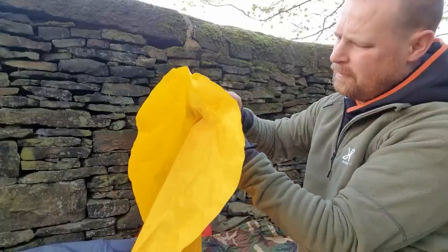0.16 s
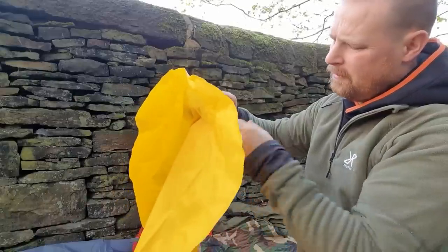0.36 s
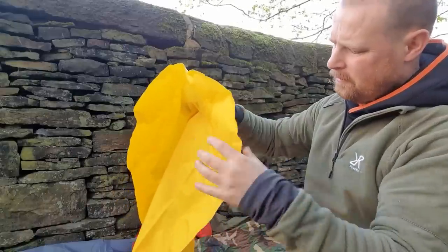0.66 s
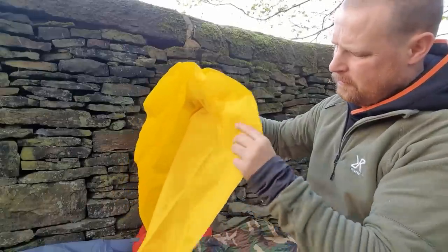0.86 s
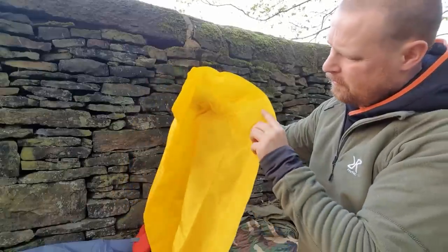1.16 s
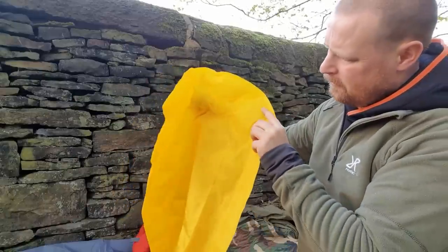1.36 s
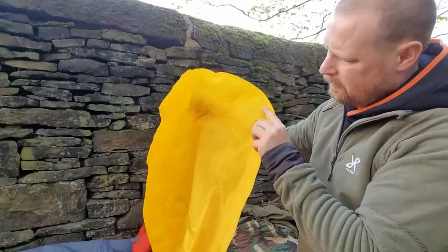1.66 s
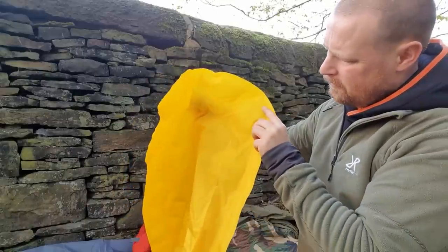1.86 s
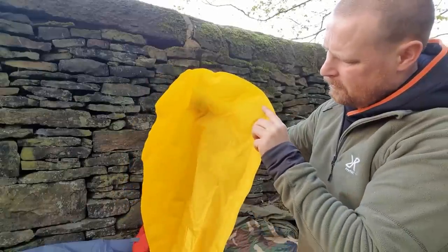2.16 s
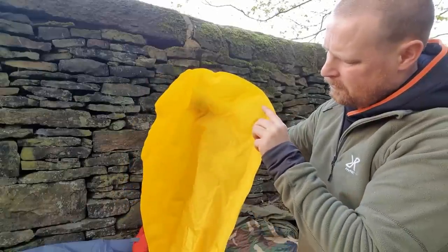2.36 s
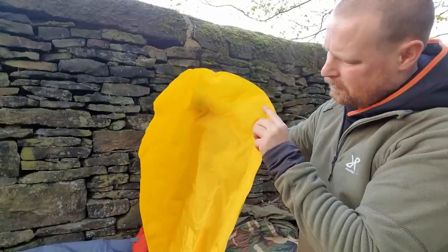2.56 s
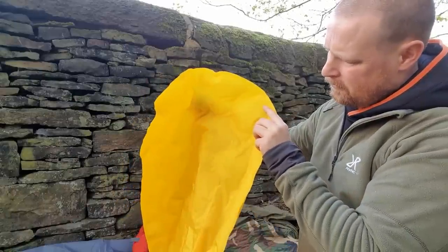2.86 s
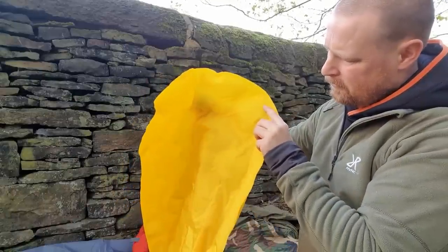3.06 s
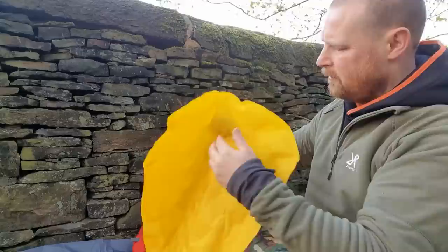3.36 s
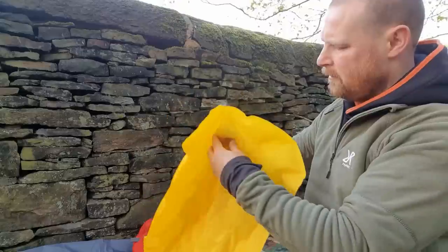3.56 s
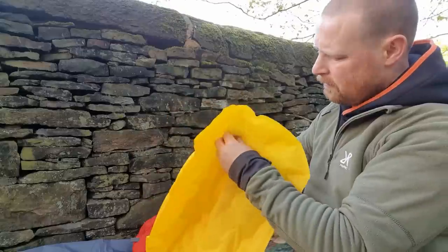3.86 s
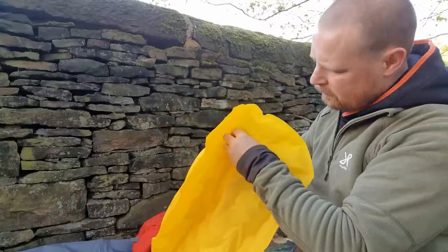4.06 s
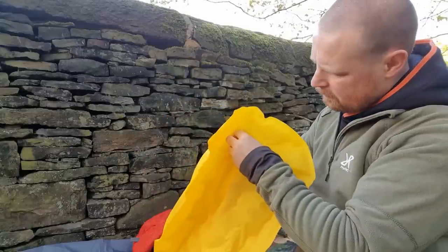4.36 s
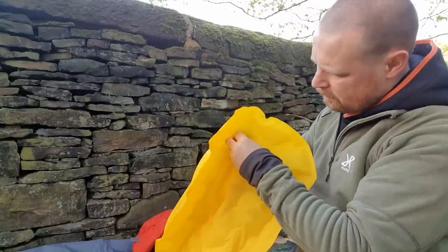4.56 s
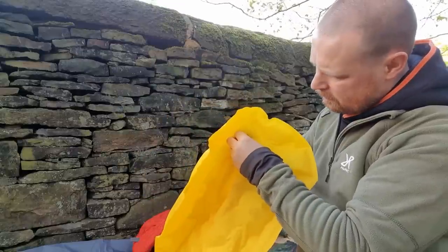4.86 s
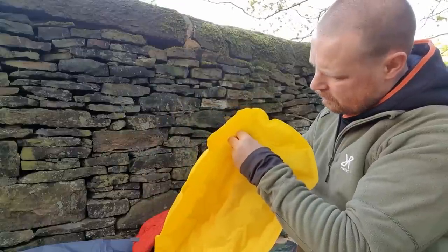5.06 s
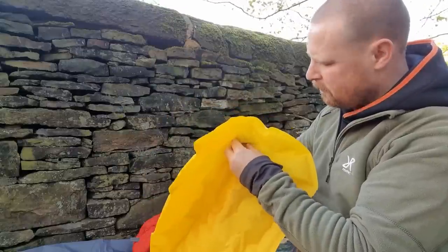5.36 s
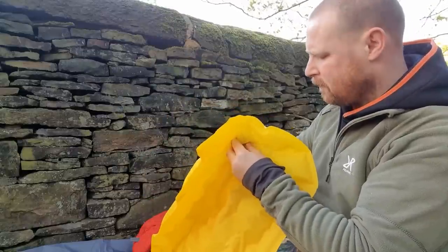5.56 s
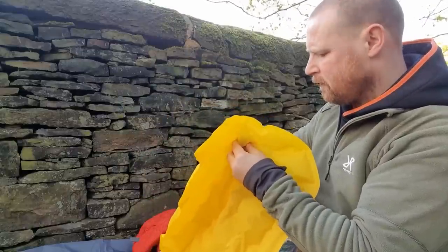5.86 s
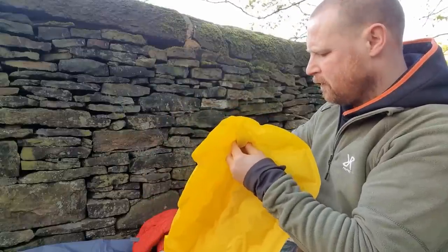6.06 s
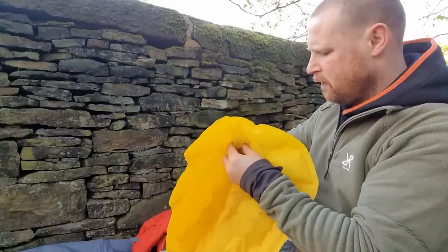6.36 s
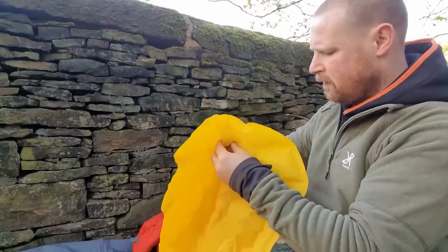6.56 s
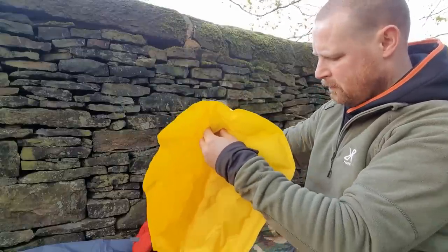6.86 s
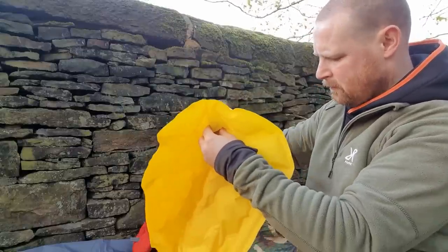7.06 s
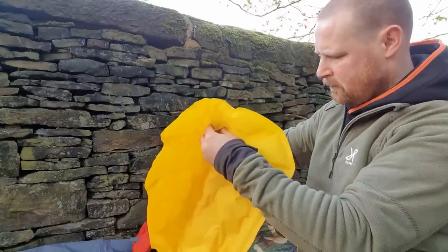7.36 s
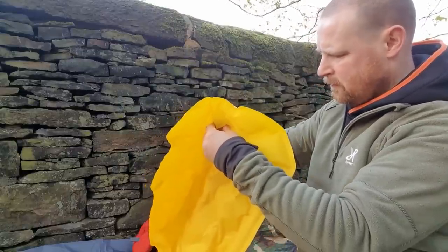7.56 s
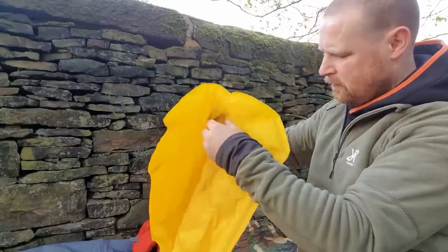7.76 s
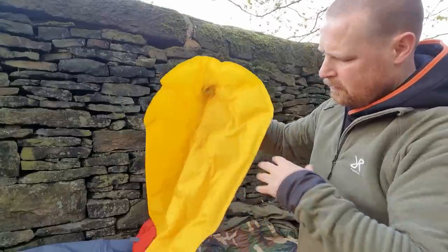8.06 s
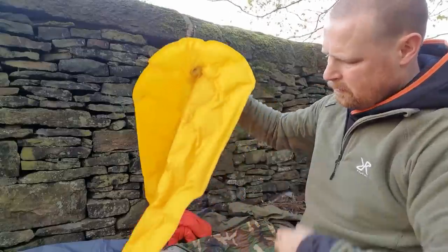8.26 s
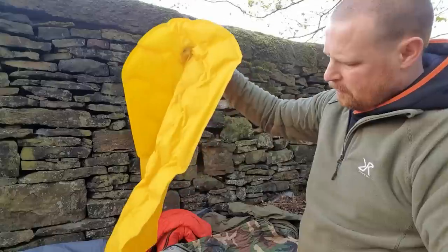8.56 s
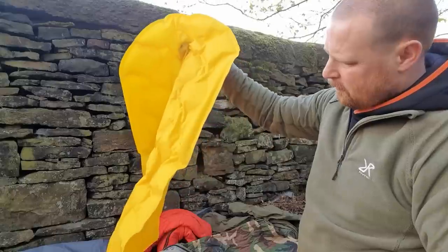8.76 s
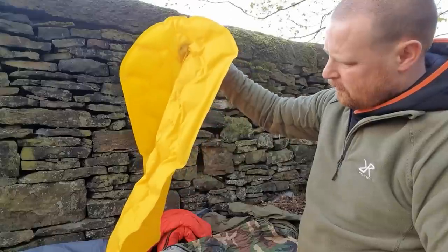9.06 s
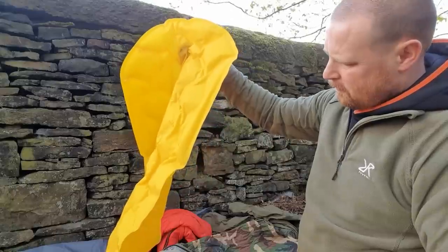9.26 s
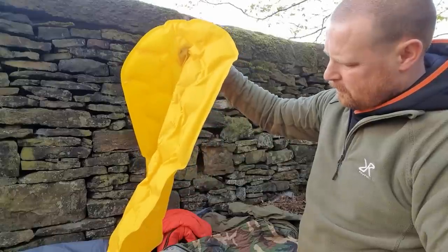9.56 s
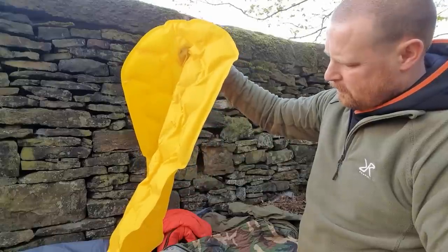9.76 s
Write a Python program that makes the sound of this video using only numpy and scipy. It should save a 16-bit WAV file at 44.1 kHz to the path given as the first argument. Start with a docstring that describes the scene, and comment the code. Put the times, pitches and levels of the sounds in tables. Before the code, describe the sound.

Outdoors, a small battery pump runs without a break close to the microphones, a piercing, slightly wavering blade whine over a strong airy rush. Tone and hiss shift as hand and fabric move around it. Just past halfway the intake is choked for an instant, the pitch races up, and air bursts back. Soft wind rumbles and buffets low underneath.

```python
"""Outdoors, a small hand-held battery pump with a nine-bladed impeller inflates a mat near two microphones.
Sines locked to the rotor speed make the hum and the blade whine; filtered noise makes the air rush,
with resonances of inlet and housing that the moving hand and fabric shade.
Once the hand chokes the inlet: the rush changes, the rotor races, then air bursts back in.
Light wind rumbles and buffets the microphones as low noise, and a far drone, a hump of noise, grows."""
import sys
import numpy as np
from scipy import signal
from scipy.io import wavfile
from scipy.ndimage import uniform_filter1d

SR = 44100
rng = np.random.default_rng(int(sys.argv[2]) if len(sys.argv) > 2 else 0)


def transcribe(signal):
    """Save signal, clipped to [-1, 1], as a 16-bit WAV file at the path in sys.argv[1]."""
    frames = np.atleast_2d(signal).T
    limited = np.clip(frames, -1, 1)
    pcm = np.round(limited * 32767).astype(np.int16)
    wavfile.write(sys.argv[1], SR, pcm)


N = 437472  # samples
SIZE, HOP = 512, 128  # short-time frame of the air rush and its step, samples

# extra travel of the pump sound to the left microphone: t/s, delay/us
LEFT_DELAY = [(0, 125), (5.3, 36), (7.0, 70), (9.92, 113)]
# the choke: when the inlet reopens, and how long it closes, stays shut and opens
OPEN_S, CLOSING_S, SHUT_S, OPENING_S = 5.21, .03, .04, .03


def amp(db):
    """Amplitude factor of a level in dB."""
    return 10 ** (np.asarray(db) / 20)


def evened(x):
    """Scale to unit mean power."""
    return x / np.sqrt(np.mean(x ** 2) + 1e-20)


def curve(rows, t):
    """All columns of a breakpoint table at times t, joined by straight lines."""
    s, *columns = np.transpose(rows)
    return np.array([np.interp(t, s, c) for c in columns])


def shape(points, hz):
    """Spectrum gain of unit mean power, through (Hz, dB) points on a log frequency axis."""
    f, db = np.transpose(points)
    return evened(amp(np.interp(np.log(hz + 1), np.log(f), db)))


def wander(t, top_hz, channels=1, count=30):
    """Slow random curves of unit power: sines of random phase up to top_hz, the slower the stronger."""
    f = np.geomspace(top_hz / 20, top_hz, count)[:, None]
    coarse = np.arange(0, t[-1] + .01, .002)
    rows = []
    for _ in range(channels):
        phase = 2 * np.pi * (f * coarse + rng.random((count, 1)))
        row = evened((np.sin(phase) / np.sqrt(f)).sum(0))
        rows.append(np.interp(t, coarse, row))
    return np.array(rows)


def noise_pair(left, right, same, size, turn=1):
    """Two partly alike noises with the given short-time magnitudes; turn rotates the left phase."""
    a, b, c, d = rng.standard_normal((left.shape[1], left.shape[0], 4)).T
    same = np.clip(same, 0, 1)
    shared = a + 1j * b
    own = c + 1j * d
    left_bins = left * shared * turn
    right_bins = right * (same * shared + np.sqrt(1 - same ** 2) * own)
    pair = signal.istft(np.array([left_bins, right_bins]), nperseg=size, noverlap=size * 3 // 4)[1]
    return pair[:, :N] * np.sqrt(1.98 / size)


def rotor():
    """Tones at multiples of the slightly unsteady rotor speed: unbalance hum, blade whine and its octave."""
    # t/s, speed/(turns per s)
    rotor_speed = [(0.0, 646.5), (0.1, 649.1), (0.38, 646.1), (1.0, 649.4), (2.08, 640.7), (2.6, 642.8),
                   (2.9, 639.2), (3.65, 638.0), (3.8, 642.3), (4.18, 645.7), (4.55, 642.7), (5.73, 638.4),
                   (6.26, 640.9), (6.45, 644.4), (6.62, 638.0), (6.86, 634.9), (7.22, 640.4), (7.75, 641.9),
                   (8.0, 637.1), (9.92, 639.2)]
    # rotor unbalance, once a turn: t/s, level/dB
    hum = [(0, -40.5), (1.29, -37.5), (3.38, -51), (3.62, -56), (3.66, -40), (5.3, -40.5), (5.7, -44),
           (5.77, -59.5), (6.8, -48.5), (7.1, -41.5), (7.9, -36.5), (8.35, -44.5), (9.92, -44)]
    # blade-passing tone: t/s, left level/dB, right level/dB, lead of left/rad
    whine = [(0, -22, -25, 1.8), (.33, -26, -31, 1.0), (.42, -27.5, -28.5, -3.0), (.81, -26.5, -30, -3.1),
             (.91, -36, -34.5, -3.3), (1.89, -29.5, -39, -.8), (2.72, -37, -47.5, .9),
             (2.83, -29, -36.5, 1.3), (3.25, -31, -40, 2.3), (3.38, -31, -28.5, 4.0),
             (3.61, -31.5, -39, 5.2), (3.69, -22, -33, 7.6), (3.87, -31, -28.5, 8.2),
             (4.05, -30.5, -33, 11.3), (4.7, -32.5, -32, 8.8), (4.82, -45, -38, 9.8),
             (5.195, -41, -42, 11.8), (5.25, -23.5, -22.5, 11.2), (5.51, -35.5, -37, 14.6),
             (5.71, -36.5, -37.5, 11.5), (6.32, -30, -32.5, 13.9), (6.52, -35, -35, 12.4),
             (6.66, -25, -29, 11.9), (7.07, -25, -30.5, 9.2), (7.44, -27.5, -29.5, 8.8),
             (7.54, -26, -34, 10.3), (7.74, -29, -30.5, 10.6), (7.84, -17.5, -19.5, 9.6),
             (8.07, -20.5, -19.5, 10.2), (8.35, -23.5, -32, 9.5), (8.44, -21.5, -26, 14.2),
             (9.92, -25.5, -24, 14.1)]
    # echoes off hand or fabric briefly cancel the whine: t/s, left drop/dB, right drop/dB
    dips = [(.37, 10, 20), (1.27, 14, 14), (4.12, 13, 4), (5.35, 12, 0), (6.81, 3, 15), (8.167, 0, 19),
            (8.4, 11, 18)]
    # octave of the whine: t/s, left level/dB, right level/dB
    octave = [(0, -27, -34), (.3, -41, -41), (2.7, -44, -46), (2.9, -34, -36), (3.4, -47, -47),
              (4.56, -26, -32), (5.21, -44, -48), (5.35, -29, -28), (5.6, -38, -42), (6.25, -48, -48),
              (6.77, -30, -38), (7.27, -48, -42), (7.42, -38, -32), (7.85, -30, -39), (8.15, -27, -35),
              (8.43, -37, -40), (9.92, -34, -38)]
    # faint tone: multiple of speed, left level/dB, right level/dB
    faint = [(3, -43, -40)]
    blades, dip_s = 9, .018

    t = np.arange(N) / SR
    speed = curve(rotor_speed, t)[0] + race(t) + 0.45 * wander(t, 40.)[0]
    angle = 2 * np.pi * np.cumsum(speed) / SR
    late = np.array([2 * np.pi * speed * curve(LEFT_DELAY, t)[0] * 1e-6, 0 * t])

    # the hum lags on the left by 1.9 times the plain travel delay
    out = amp(curve(hum, t) + 1.5 * wander(t, 90.)) * np.sin(angle - 1.9 * late)

    left_db, right_db, lead = curve(whine, t)
    dips_db = sum(np.c_[drop_db] * np.exp(-((t - s) / dip_s) ** 2) for s, *drop_db in dips)
    flutter_db = 1.4 * wander(t, 45., channels=2)
    whine_gain = amp([left_db, right_db] - dips_db + flutter_db)
    lead_pair = [lead + .35 * wander(t, 40.)[0], 0 * t]
    out += whine_gain * np.sin(blades * angle + lead_pair)

    # short waves scatter off hand and fabric: level and phase drift apart at the two microphones
    drift = [[-1.8], [0]] + .8 * wander(t, 12., channels=2)
    octave_gain = amp(curve(octave, t) + 3.0 * wander(t, 40., channels=2))
    out += octave_gain * np.sin(2 * blades * angle + drift)

    for multiple, *db in faint:
        flutter_db = 2.5 * wander(t, 10.0, channels=2)
        out += amp(np.c_[db] + flutter_db) * np.sin(np.round(multiple) * (angle - late))
    return np.sqrt(2) * out  # makes the table levels RMS levels


def rush():
    """Turbulent air excites the housing resonances; eddies make the level patchy and flickering."""
    # resonances of inlet and housing: f/Hz, width 9 dB down/Hz, left over right/dB, left-right likeness (0-1)
    housing = [(1774, 1060, -2, 0.94), (2535, 1130, -5, 0.9), (3310, 1300, -2, 0.043),
               (5240, 2100, 2.5, 0.85), (6940, 1610, -6, 0.15), (10305, 1060, -3, 0.043)]
    # relative spectrum of the broad jet noise: f/Hz, level/dB
    hiss = [(350, -66), (700, -41), (1000, -2), (6000, -5.5), (8500, -19.5), (12300, -7), (15500, -11)]
    # ridges and notches while the hand holds still: f/Hz, start/s, end/s, left gain/dB, right gain/dB
    ridges = [(2190, 0, 7.9, -4, -6), (2670, 1.0, 3.8, 4, 4), (2640, 5.36, 5.4, 5, 5),
              (3400, 8.0, 9.92, -6, 0)]
    hiss_db, ridge_hz = -36, 120  # jet level ahead of the side gains; ridge half-width

    hz = np.fft.rfftfreq(SIZE, 1 / SR)
    t = np.arange(N // HOP + 5) * HOP / SR
    f, width, pan_db, same = np.array(housing).T[:, :, None, None]
    modes = (1 + (2 * (hz[:, None] - f) / width) ** 2) ** -3.0 * np.ones(len(t))
    power = amp(housing_db(t)) ** 2
    modes *= (power / modes.mean(1))[:, None]

    # the jet follows the total resonance power, but less strongly
    total = power.sum(0)
    jet_power = amp(hiss_db) ** 2 * (total / total.mean()) ** .45
    jet = np.outer(shape(hiss, hz) ** 2, jet_power)

    # these are powers, so each side moves by half the dB written here
    left = (modes * amp(pan_db)).sum(0) + jet * amp(2.5)
    right = (modes / amp(pan_db)).sum(0) + jet / amp(-7.5)
    jet_alike = jet * 0.75 / (1 + (hz[:, None] / 4000) ** 2)
    alike = ((modes * same).sum(0) + jet_alike) / (modes.sum(0) + jet)

    # echoes off hand and fabric lay narrow, slowly shifting ridges over the spectrum
    patches = rng.standard_normal((len(t), len(hz))).T
    patches = uniform_filter1d(patches, size=2, axis=0)
    patches = evened(uniform_filter1d(patches, size=300, axis=1))
    ridges_db = np.zeros((2, len(hz), len(t)))
    for center_hz, start, end, *db in ridges:
        held = np.clip(np.minimum(t - start, end - t) / .15 + 1, 0, 1)  # fades 0.15 s beyond each end
        ridge = np.outer(np.exp(-((hz - center_hz) / ridge_hz) ** 2), held)
        ridges_db += np.c_[db][:, None] * ridge
    eddies = amp(ridges_db + 1.5 * patches + .7 * wander(t, 80.))

    delay = np.exp(-2j * np.pi * np.outer(hz, curve(LEFT_DELAY, t)[0]) * 1e-6)
    return noise_pair(np.sqrt(left) * eddies[0], np.sqrt(right) * eddies[1], alike, size=SIZE, turn=delay)


def housing_db(t):
    """Level of each resonance: hand and fabric shade the air rush, and the choke reshapes it."""
    # t/s, low rush level/dB, main resonance level/dB, treble level/dB
    air = [(0, -32.5, -20.5, -36.5), (1.16, -29, -23.5, -45), (3.15, -30, -24.5, -48),
           (3.46, -31, -26.5, -48.5), (3.8, -30, -21, -42), (4.1, -30.5, -27.5, -41),
           (4.65, -36, -22.5, -34), (5.0, -24.5, -26, -40.5), (5.2, -32, -30.5, -44),
           (5.37, -34.5, -21.5, -36), (5.6, -29.5, -29, -40), (6.2, -25.5, -28.5, -38.5),
           (6.53, -25, -31.5, -44), (6.72, -30.5, -27.5, -46), (7.3, -29.5, -28.5, -40.5),
           (7.7, -25, -24.5, -47), (7.97, -31, -30, -43.5), (8.4, -32, -30.5, -52),
           (8.72, -31.5, -32, -40.5), (9.92, -35, -32, -41)]
    # third to fifth resonance follow those levels: mean level/dB, share of low, share of main, share of treble
    followers = [(-42, 0.74, -2.21, 0.11), (-38, 0.49, -0.85, 0.43), (-38.5, 0.053, 0.45, 0.17)]
    # one row a resonance: change while shut/dB, rise in the burst/dB
    choke = [(-4, 9), (-5, 4), (-17, 6), (-1, 11), (-3, 10.5), (3, 6)]
    narrow_s, narrow_db = 0.048, 7

    levels = curve(air, t)
    low, main, treble = levels
    follow = np.array(followers)
    swings = levels - levels.mean(1, keepdims=True)
    third, fourth, fifth = follow[:, :1] + follow[:, 1:] @ swings
    # the narrowing gap hisses in the fourth resonance around the time the hand starts to close it
    narrow_at = OPEN_S - SHUT_S - CLOSING_S - narrow_s / 2
    fourth += narrow_db * np.exp(-((t - narrow_at) / narrow_s) ** 2)
    return np.array([low, main, third, fourth, fifth, treble]) + np.array(choke) @ [shut(t), burst(t)]


def wind():
    """Lumpy rumble, its gusts differing between the microphones; buffets are short and reach higher."""
    # mean of the two sides: t/s, level/dB
    strength = [(0, -44), (2.5, -39), (4.6, -46), (4.95, -37.5), (6.0, -40.5), (8.2, -39.5), (8.85, -30),
                (9.3, -44)]
    # relative spectrum: f/Hz, level/dB
    rumble = [(30, -6), (65, 8.5), (110, -4.5), (170, -15.5), (450, -37.5)]
    # gusts that buffet the microphone ports: t/s, left rise/dB, right rise/dB
    buffets = [(1.02, 16.5, 6), (2.36, 8, 8.5), (2.87, 15, 3), (5.03, 12, 17.5), (5.46, 14.5, 12),
               (5.65, 12, 4), (5.85, 6, 11), (6.88, 18.5, 0), (7.26, 12.5, 0), (7.72, 12, -3), (7.9, 5, 9)]

    hz = np.fft.rfftfreq(4 * SIZE, 1 / SR)
    t = np.arange(N // SIZE + 5) * SIZE / SR
    gusts_db = curve(strength, t) + 3.9 * wander(t, 40., channels=2) + [[1.2], [-1.2]]
    buffets_db = np.zeros((2, len(t)))
    for s, *rise_db in buffets:
        buffets_db += np.c_[rise_db] * np.exp(-((t - s) / 0.092) ** 2)
    # buffets lift nothing below 8 Hz and lift fully from about 160 Hz up
    reach = np.clip(np.log(hz / 8 + 1e-9), 0, 3.0)[:, None] / 3
    spectrum = shape(np.vstack([rumble, [SR, -150]]), hz)[:, None]
    left, right = spectrum * amp(gusts_db[:, None] + reach * buffets_db[:, None])
    return noise_pair(left, right, .35, size=4 * SIZE)


def drone():
    """Far-off smooth noise in one broad low hump, much alike at both microphones."""
    # slow growth: t/s, level/dB
    growth = [(0, -67), (9.92, -44.5)]
    hz = np.fft.rfftfreq(4 * SIZE, 1 / SR)
    t = np.arange(N // SIZE + 5) * SIZE / SR
    spectrum = evened(hz / (1 + (hz / 200) ** 2) ** 1.42)
    hump = np.outer(spectrum, amp(curve(growth, t)[0]))
    return noise_pair(hump, hump, 0.79, size=4 * SIZE)


def shut(t):
    """How far the hand closes the inlet, 0-1."""
    return np.interp(t, OPEN_S + np.array([-SHUT_S - CLOSING_S, -SHUT_S, 0, OPENING_S]), [0, 1, 1, 0])


def race(t):
    """Extra turns per second: the unloaded rotor speeds up while choked, settling once the load returns."""
    race_hz, settle_s = 20, .1
    gaining = np.clip(1 + (t - OPEN_S) / (CLOSING_S + SHUT_S), 0, 1)
    return race_hz * gaining * np.exp(-np.maximum(t - OPEN_S, 0) / settle_s)


def burst(t):
    """Air bursts back in as the inlet opens: a short surge with peak 1, reached after 35 ms."""
    u = np.maximum(t - OPEN_S, 0) / .035
    return (u * np.exp(1 - u)) ** 2


def scene():
    """Pump tones, air rush, wind and the far drone."""
    return rotor() + rush() + wind() + drone()


def record(dry):
    """The band limit of the recorder: a steep low-pass."""
    edge_hz = 15480
    lowpass = signal.firwin(1023, edge_hz, window=("kaiser", 9), fs=SR)
    return signal.oaconvolve(dry, lowpass[None], "same")


dry = scene()
out = record(dry)
transcribe(out)
```